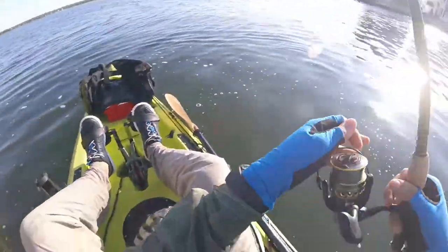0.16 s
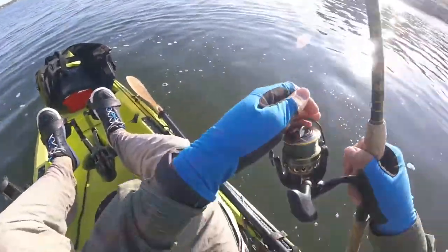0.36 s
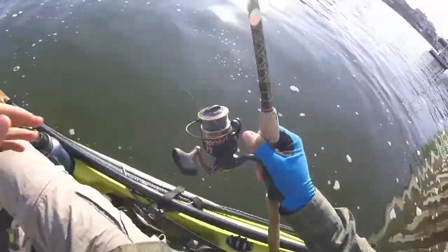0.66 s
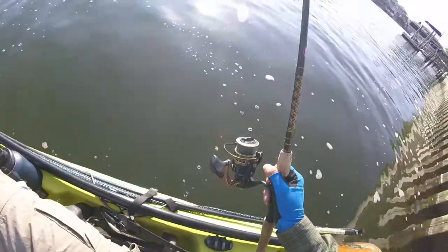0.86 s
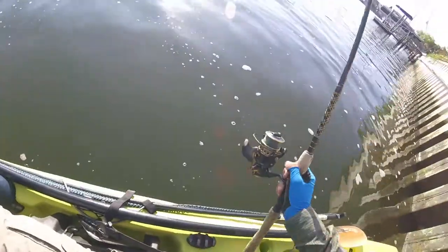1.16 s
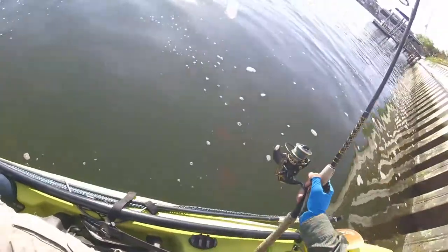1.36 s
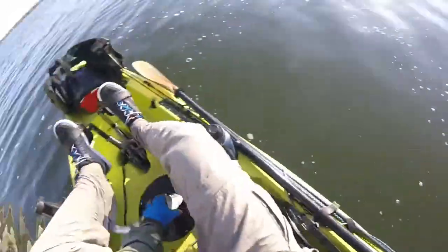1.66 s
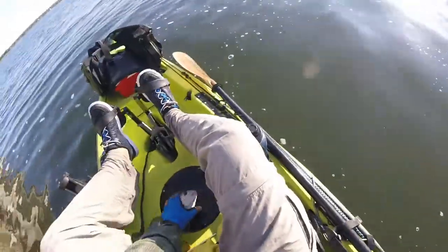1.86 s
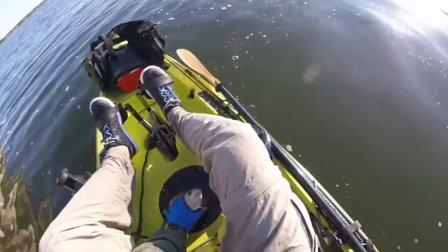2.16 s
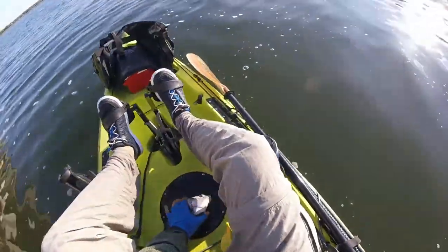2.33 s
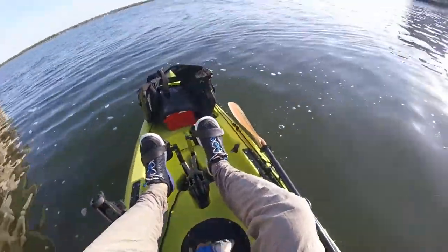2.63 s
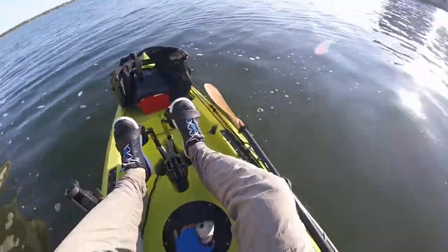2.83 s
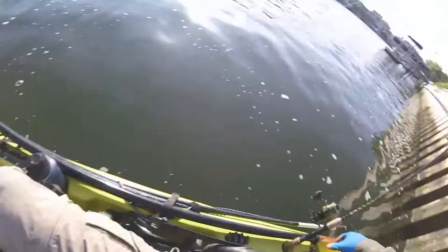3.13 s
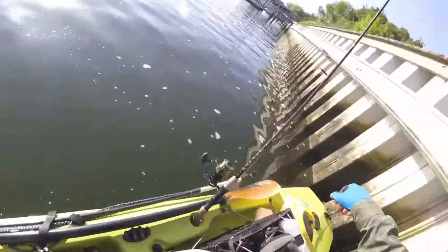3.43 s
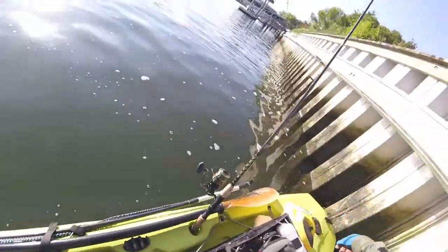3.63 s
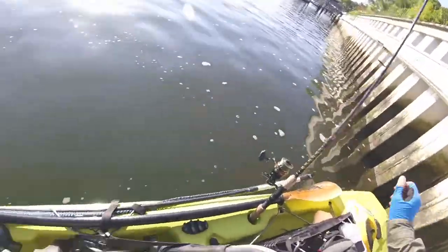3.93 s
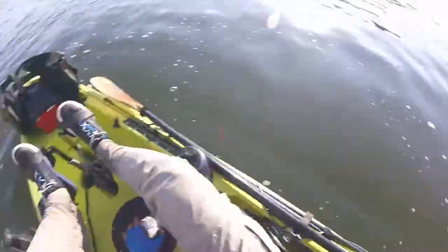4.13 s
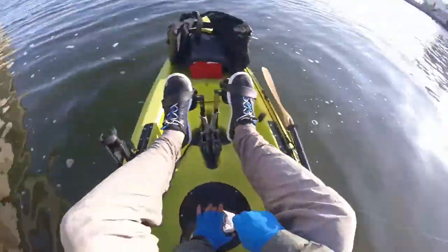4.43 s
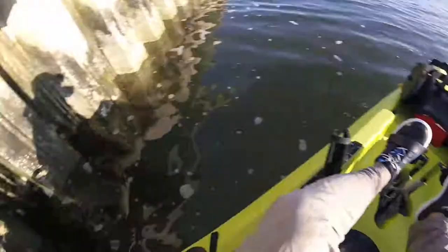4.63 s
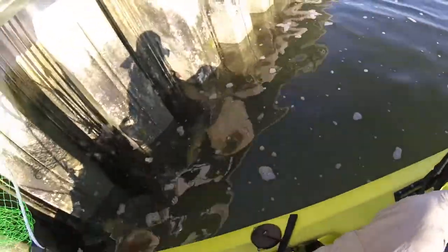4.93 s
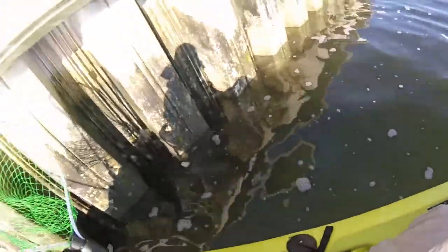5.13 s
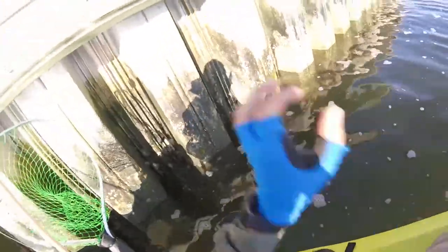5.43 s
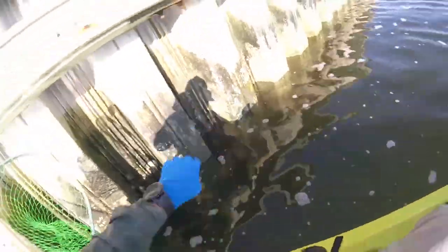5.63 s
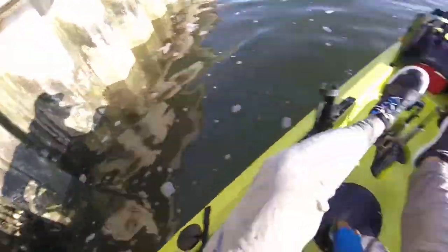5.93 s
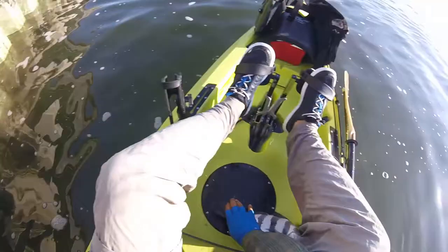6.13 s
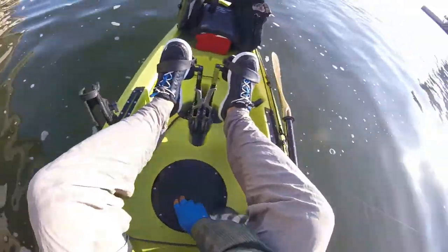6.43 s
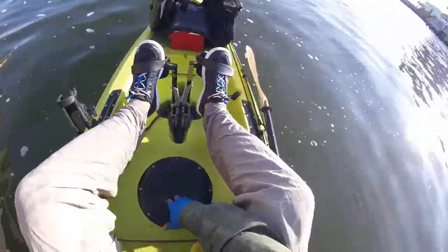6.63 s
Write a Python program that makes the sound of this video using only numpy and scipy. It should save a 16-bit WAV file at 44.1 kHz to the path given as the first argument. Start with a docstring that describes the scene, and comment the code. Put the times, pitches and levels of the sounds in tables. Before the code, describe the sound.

A body-worn microphone catches a fish flopping against a hollow plastic hull. Two crisp reel or rod clicks come first in near quiet. Dense irregular drumming with wet smacks runs for about two seconds, then a lull with dull grunts, tiny bird whistles and cloth rubbing. Harder, more spaced thumps return with faint metal rattle, fading to separate taps.

```python
"""Thuds and wet slaps of a hooked fish flopping in the open hatch of a hollow plastic kayak on calm water.
Each landing rings hull air, deck panel and hull modes; slaps and gear clicks are shaped noise bursts.
Loose metal tackle and swim-bladder grunts are decaying modes; far-off birds are gliding sines.
Rubbing, a low rumble of wind and rocking hull, and steady hiss are coloured noise under level curves."""
import sys
import numpy as np
from scipy import signal
from scipy.fft import rfft, irfft
from scipy.io import wavfile
from scipy.ndimage import uniform_filter1d

SR = 44100
rng = np.random.default_rng(int(sys.argv[2]) if len(sys.argv) > 2 else 0)


def voltage_ratio(level):
    """Linear amplitude factor for a level in decibels (scalar or array-like)."""
    return 10 ** (np.asarray(level, float) / 20)


def log_audio(samples):
    """Write samples as a 16-bit WAV file to the path given in sys.argv[1]."""
    # one column per channel
    frames = np.atleast_2d(samples).T
    # limit to full scale, then quantise
    limited = np.clip(frames, -1, 1)
    pcm = np.round(limited * 32767).astype(np.int16)
    wavfile.write(sys.argv[1], SR, pcm)


N = 298998  # samples

# Fish landings; its weight loads the deck panel and shifts the thump.
# Each row: start in seconds, hull boom drive in dB, deck thump drive in dB, thump in Hz, knock drive in dB.
LANDINGS = [(1.5533, -30, -13, 127, -8.5), (1.5709, -15, -54, 149, -9.5), (1.6109, -44, -47, 121, -28),
            (1.7204, -36, -16, 132, -17), (1.7732, -14.5, -20, 134, -2.5), (1.806, -41, -31, 147, -21),
            (1.8706, -20, -20, 128, -42), (1.905, -36, -17.5, 150, -12.5), (1.9401, -26, -33, 117, -23),
            (1.9725, -24, -17.5, 142, -20), (1.9955, -23, -18.5, 130, -16),
            (2.0748, -38, -12.5, 135, -17.5), (2.101, -19, -17, 158, -10), (2.1396, -34, -35, 175, -21),
            (2.1787, -31, -14, 130, -17.5), (2.2032, -16.5, -36, 185, -8), (2.2736, -32, -13, 135, -43),
            (2.2937, -13.5, -16.5, 151, -9), (2.3761, -36, -14.5, 141, -29), (2.3905, -13, -26, 148, -9),
            (2.4182, -20, -28, 172, -35), (2.4911, -19, -12.5, 129, -21), (2.5108, -13, -18.5, 144, -13.5),
            (2.5833, -25, -25, 129, -19.5), (2.5977, -28, -10.5, 139.6, -9), (2.6311, -32, -28, 140, -17),
            (2.6966, -19, -12.5, 143, -39), (2.7055, -38, -17, 150, -10), (2.7554, -45, -28, 133, -24),
            (2.7995, -16, -9, 134, -44), (2.8205, -43, -13.5, 151, -13), (2.9512, -18, -11.5, 128, -48),
            (2.963, -29, -12.5, 155.6, -7.5), (2.9743, -34, -15, 156, -35), (3.0583, -41, -21, 122, -43),
            (3.07, -41, -29, 171, -37), (3.0842, -10, -9.5, 163, -10.5), (3.2409, -16.5, -15, 168, -14),
            (3.4215, -35, -14, 152, -12), (3.4357, -16.5, -31, 162, -12.5), (3.4595, -32, -29.5, 147, -37),
            (3.6227, -44, -24.5, 171, -19), (4.1, -25.5, -41, 111, -37), (4.175, -35, -33, 110, -51),
            (5.0861, -33, -31, 150, -22), (5.137, -11, -8, 139, -10.5), (5.1625, -13, -15.5, 155, -15),
            (5.2611, -43, -50, 156, -36), (5.3227, -13, -9, 138, -12.5), (5.3401, -23, -21, 133, -12.5),
            (5.3529, -14, -20.5, 182, -13.5), (5.396, -32, -30, 136, -19.5), (5.467, -14, -15, 131, -18),
            (5.496, -26, -18, 179, -13), (5.5069, -6.5, -16.5, 168, -14), (5.6579, -11.5, -12, 132, -10.5),
            (5.7988, -34, -15, 142, -21.5), (5.8125, -14.5, -38, 139, -21.5),
            (5.9396, -21, -26.5, 137, -28.5), (6.0401, -58, -36, 123, -27), (6.065, -36, -28, 139, -23.5),
            (6.1157, -33, -27.5, 176, -17), (6.1381, -30, -22, 130, -13), (6.1567, -41, -33, 137, -16),
            (6.172, -45, -43, 177, -52), (6.3507, -41, -20, 162, -14), (6.4462, -29, -20.5, 143, -14.5),
            (6.4754, -30, -27, 157, -29), (6.6392, -22, -19, 151, -11.5), (6.6669, -20, -27.5, 164, -24)]
# Rod, reel and hands bump the hull. Each row: start in seconds, hull boom drive in dB,
# deck thump drive in dB, knock drive in dB, knock centre in Hz.
BUMPS = [(0.0794, -54, -36, -23.5, 303), (0.452, -65, -60, -29, 330), (0.4842, -63, -40.5, -35, 1090),
         (0.8024, -42, -41.5, -53, 200), (0.8553, -35, -40, -58, 300), (0.8642, -33, -38, -19, 650),
         (1.286, -59, -36.5, -45, 210), (1.335, -57, -44, -52, 200), (1.443, -34, -26.5, -8, 1000),
         (3.929, -59, -52, -36.5, 410), (4.8051, -50, -43, -30.5, 330), (4.9618, -52, -54, -35, 605)]
# Air modes in the hull. Each row: nominal frequency in Hz, relative level in dB, t60 in seconds.
BOOM_MODES = [(53, -4, .13), (60, 0, .12), (82, -8, .08)]
# Knock modes of the hull. Each row: nominal frequency in Hz, relative level in dB, t60 in seconds.
HULL_MODES = [(237.7, 2.5, 0.082), (283, 2, 0.089), (352.2, -2, 0.1), (453.3, -2, 0.077),
              (509.4, -13, 0.16), (650, -9.5, 0.069), (820, -13.5, 0.2), (924, -6, 0.11), (1182, -6, 0.089),
              (1500, -23.5, 0.013), (1990, -18, 0.028)]
THUMP_T60_S, BARE_THUMP_HZ = .095, 172  # deck panel; bare = without the fish's weight
KNOCK_HZ, HARD_OCTAVES, HARD_DB = 330, 0.13, 12  # knock well above thump: a hard, brighter landing
HELD_S = .025  # the hand on the gear damps its knock

# Wet skin, fins and tail smack the plastic; loose tackle knocks too.
# Each row: start in seconds, drive in dB, brightness centre in Hz, decay in ms.
SLAPS = [(.995, -41, 1500, 8.9), (1.287, -52, 2680, 7.6), (1.553, -17, 1540, 15), (1.567, -14, 2800, 3.5),
         (1.601, -30.5, 2380, 6), (1.6614, -34, 3070, 9.8), (1.6858, -21, 3560, 1.1),
         (1.7145, -29, 4000, 8.5), (1.7721, -11.5, 2300, 14), (1.8318, -20, 2630, 19.4),
         (1.8913, -20, 2930, 15), (1.9046, -2, 2070, 3), (1.9392, -27.5, 3570, 14), (1.9723, -26, 2090, 19),
         (1.991, -24, 2340, 33), (2.001, -20, 3200, 6.2), (2.0725, -20.5, 2400, 10),
         (2.0987, -9.5, 2250, 12.6), (2.117, -30, 5000, 2.7), (2.1781, -19.5, 1760, 2.9),
         (2.198, -12, 2630, 6.6), (2.2045, -8.5, 2700, 4), (2.2737, -21, 2160, 2.1),
         (2.294, -11, 2640, 4.3), (2.374, -25, 3710, 17), (2.3893, -8, 2150, 4), (2.4909, -24.5, 2370, 2.7),
         (2.5083, -19, 2300, 16), (2.5427, -16, 2400, 8.5), (2.5839, -17, 1650, 5.9),
         (2.5943, -19, 1830, 4.7), (2.6038, -13, 1410, 15), (2.6297, -16, 1140, 5.8),
         (2.694, -26, 1730, 7.3), (2.7028, -5, 1710, 5.8), (2.75, -27.5, 5100, 13), (2.774, -16, 2730, 5.7),
         (2.7976, -19, 2040, 7.1), (2.809, -7, 1490, 5), (2.8706, -35, 1290, 5.5), (2.8992, -28, 2380, 8.3),
         (2.9495, -15.5, 2130, 7), (2.962, -7.5, 1550, 5.1), (3.063, -32.5, 3820, 2),
         (3.0845, -9, 2260, 5.5), (3.113, -31.5, 4950, 14), (3.21, -25, 1300, 13.5),
         (3.2402, -11.5, 1500, 7.8), (3.3147, -31, 1290, 14), (3.3527, -23, 1920, 4.8),
         (3.4204, -21, 1450, 5.3), (3.4347, -7.5, 2100, 6), (3.4569, -13.5, 925, 10.5),
         (3.5293, -33, 1880, 19), (3.622, -26, 1150, 9.2), (3.648, -24.5, 1070, 7.3),
         (3.6726, -26, 1140, 3.7), (3.695, -44.5, 3820, 9.6), (3.927, -36, 1930, 4.5),
         (3.936, -45.5, 5130, 11), (4.596, -38, 2800, 4.5), (4.619, -42, 2420, 4.2), (4.823, -35, 1430, 12),
         (4.9592, -35, 1500, 15), (5.0595, -29, 2300, 14), (5.0883, -21, 950, 3.6), (5.136, -17, 1050, 42),
         (5.1632, -18, 1700, 17), (5.2576, -26.5, 1950, 18), (5.282, -20, 2140, 16),
         (5.3209, -14, 1110, 2.9), (5.3413, -18, 1850, 6.5), (5.3524, -7, 1670, 7.9),
         (5.392, -23, 2800, 7.2), (5.4685, -21, 2400, 3.2), (5.497, -16, 2150, 13), (5.5063, -5, 2260, 4.5),
         (5.5505, -19, 1140, 4.5), (5.5653, -22.5, 1900, 14), (5.608, -37, 2740, 5.5),
         (5.6576, -8, 1300, 10.7), (5.798, -28, 2220, 11), (5.8127, -13, 1100, 18),
         (5.9362, -30.5, 3400, 4.1), (5.945, -30, 3600, 4.5), (6.0406, -24, 4500, 3.5),
         (6.0626, -30, 2380, 7.4), (6.1149, -27.5, 3640, 4.9), (6.1556, -11.5, 654, 12),
         (6.3509, -22, 1040, 4), (6.4457, -16.5, 1670, 6.1), (6.4611, -25.5, 2920, 13),
         (6.5113, -19, 1820, 2.3), (6.5293, -33.5, 5340, 3.7), (6.6094, -22.5, 3470, 3),
         (6.6388, -28, 2520, 4.1), (6.6518, -21.5, 1180, 3.5), (6.6657, -22.5, 830, 5.1)]
# Slap colour. Each row: frequency in Hz, level in dB.
SLAP_COLOUR = [(500, 20), (1200, 1), (2500, -5), (5000, -8.5), (9000, -16), (13000, -19), (15000, -45)]
SLAP_RISE_MS = 1.54

# Small rebounds of fins and gear at random moments, as strong as the fish is busy.
REBOUNDS, REBOUND_SPREAD_DB = 70, 7.5
REBOUND_KNOCK_DB, REBOUND_SLAP_DB = -16, -23
REBOUND_HZ, REBOUND_MS = 2300, 2.5  # slap centre before the random brightness factor; slap decay

# Rubbing of cloth and hands on wet plastic.
# Each row: time in seconds, low rub level in dB, bright rub level in dB.
RUB = [(0, -61, -83), (.36, -57, -69), (.53, -65, -99), (.83, -66, -59.5), (.98, -55.5, -66),
       (1.3, -73, -60.5), (3.5, -55, -89), (3.87, -59, -67), (4.19, -71, -67.5), (4.38, -61, -64),
       (4.44, -50, -54), (4.57, -56, -49), (4.87, -50.5, -67), (5.04, -50.5, -53.5), (5.25, -43.5, -45.5),
       (6.0, -45.5, -55.5), (6.3, -59, -66.5), (6.78, -89, -51.5)]
# Low rub colour. Each row: frequency in Hz, level in dB.
RUB_LOW = [(120, 11), (300, 9.5), (520, 2), (900, -4.5), (1500, -15), (2500, -33), (4000, -58)]
# Bright rub colour. Each row: frequency in Hz, level in dB.
RUB_BRIGHT = [(800, 14), (2000, 8.5), (3800, 6.5), (5500, -2.5), (9000, -16), (12500, -54), (15000, -52)]
SETTLE_S = 0.053  # slide after a landing dies by 1/e
SLIDE_LOW_DB, SLIDE_BRIGHT_DB = -24, -41  # rub under the slide, relative to the landing

# Reel bail and rod butt click.
# Each row: start in seconds, drive in dB, brightness centre in Hz, rise in ms, decay in ms.
CLICKS = [(.4665, -36, 5030, .6, 3.0), (.4705, -29, 4900, .8, 2.4), (0.4828, -10.5, 4480, 0.46, 3.2),
          (.4843, -5, 2380, 0.28, 2.3), (.4846, -8.5, 5640, 0.48, 1.3), (.486, -20, 3500, 0.23, 2),
          (.5, -35.5, 5030, 7.5, 6), (.8628, -22, 1670, 0.22, 5.4), (1.421, -49, 3300, .8, 3.9),
          (1.4408, -7.5, 6070, 0.5, 3.5), (1.4432, -2, 1730, 0.66, 1.4), (1.448, -21, 6500, .6, 1.5),
          (1.45, -17.5, 1070, 1.2, 8.2)]
# Click colour. Each row: frequency in Hz, level in dB.
CLICK_COLOUR = [(600, -8), (1200, -3), (2200, -3), (3000, -6), (4000, 2), (6500, -9.5), (10000, -10),
                (13000, -14), (15000, -39)]

# Loose metal tackle is jolted. Each row: start in seconds, drive in dB, centre of favoured modes in Hz,
# fall in dB per octave squared, seconds until it is damped.
JOLTS = [(1.47, -54, 2358, 30, 0.1), (2.389, -42, 2358, 1, .1), (2.751, -37.5, 2340, 39, 0.1),
         (3.114, -39.5, 3500, 1, 0.073), (4.799, -48.5, 1340, 30, 0.12), (5.39, -34, 2200, 1, 0.105),
         (5.608, -54, 1740, 27, 0.063), (6.061, -47, 2000, -2, 0.083)]
# Metal modes. Each row: frequency in Hz, relative level in dB, t60 in seconds.
TACKLE_MODES = [(1220, -1, .3), (1318, -7, .3), (1578, -5, .2), (2094, -11, .3), (2358, 0, .45),
                (2880, -10, .2), (3110, -6, .3), (3600, -9, .1), (3890, -10, .2), (4060, -12, .2),
                (4740, 0, .07), (5712, -14, .15), (6218, -24, .25), (6751, -20, .2), (7540, -18, .08),
                (8010, -18, .1), (9580, -22, .08)]

# Swim-bladder twitches. Each row: start in seconds, drive in dB.
GRUNTS = [(3.777, -34), (3.805, -33.5), (3.84, -32.5), (3.88, -32), (4.078, -30.5), (4.111, -34.5),
          (4.146, -30.5)]
# Bladder modes. Each row: nominal frequency in Hz, relative level in dB, t60 in seconds.
BLADDER_MODES = [(170.8, -6, 0.19), (282, 15, 0.02), (450, -1, 0.041), (584, -2.5, 0.032)]

# Bird notes. Each row: start in seconds, length in seconds, start in Hz, end in Hz, level in dB.
BIRDS = [(.26, 0.036, 2384, 2080, -65), (0.362, 0.041, 3430, 3950, -63), (.396, .022, 3880, 3370, -65),
         (0.414, .022, 3430, 4170, -67), (1.062, .126, 3560, 2350, -67), (1.32, 0.032, 2970, 2760, -72),
         (1.38, .028, 4150, 3400, -72), (3.837, 0.028, 3830, 3600, -70), (4.075, 0.023, 2900, 2930, -70),
         (4.103, .025, 3320, 3350, -64), (4.195, 0.092, 2740, 2340, -66), (6.387, 0.031, 4100, 2980, -61)]
GLIDE = .17  # share of a note in which it slides most of the way to its end pitch

# Low rumble level. Each row: time in seconds, level in dB.
RUMBLE_LEVEL = [(0, -48.5), (.66, -53), (.85, -46), (1.26, -51.5), (1.66, -32.5), (2.4, -48), (2.93, -48),
                (3.27, -40), (3.51, -38), (3.87, -50), (4.85, -50), (5.55, -32), (6.16, -36.5), (6.34, -39),
                (6.78, -37)]
# Low rumble colour. Each row: frequency in Hz, level in dB.
RUMBLE_COLOUR = [(15, 20.5), (30, 23.5), (60, 19.5), (130, 13), (250, 1), (500, -33)]
# Background hiss level. Each row: time in seconds, level in dB.
HISS_LEVEL = [(0, -56), (.43, -57.5), (.55, -63.5), (4.3, -61.5), (4.45, -57.5), (6.78, -60)]
# Hiss colour. Each row: frequency in Hz, level in dB.
HISS_COLOUR = [(300, 3.5), (1000, -6), (3000, -8.5), (5000, -21), (8000, -12.5), (12500, -24.5),
               (14800, -30)]

PORT_HZ, PORT_WIDTH_HZ, PORT_DB = 6423, 268, 14.5  # the microphone port resonates
CEILING = .95  # soft saturation of the input, full scale = 1
LOW_HZ, TOP_HZ = 30, 13300  # input band edges


def evened(x):
    """Scales to unit rms."""
    return x / np.sqrt(np.mean(x ** 2) + 1e-20)


def drift(x, size):
    """Slow random curve of unit rms: white noise x under a moving average of size samples."""
    return evened(uniform_filter1d(x, size=size))


def read(points, hz):
    """Reads a spectrum in dB on a log-frequency axis."""
    f, db = np.transpose(points)
    return np.interp(np.log(hz + 1), np.log(f + 1), db)


def level(rows, column):
    """Gain along a curve in dB."""
    rows = np.array(rows)
    return voltage_ratio(np.interp(np.arange(N) / SR, rows[:, 0], rows[:, column]))


def add(mix, start_s, sound):
    """Mixes a sound in at start_s, cut at the end of the mix."""
    part = mix[round(start_s * SR):][:len(sound)]
    part += sound[:len(part)]


def bell_db(hz, centre_hz, fall_db):
    """Level falls by fall_db for each octave squared away from the centre."""
    return -fall_db * np.log2(hz / centre_hz) ** 2


def ring(modes, shift_db, contact_s, spread_db=0., detune=0., size=9000):
    """A blow of finite contact time rings the modes; where it lands changes their share and tuning a little."""
    hz, db, t60_s = np.transpose(modes)[:, :, None]
    share_chance, tuning_chance = rng.standard_normal((2, len(modes), 1))
    t = np.arange(size) / SR
    usual = voltage_ratio(db + np.reshape(shift_db, (-1, 1)))
    share = usual * voltage_ratio(spread_db * share_chance)
    share = share * np.linalg.norm(usual) / np.linalg.norm(share)  # the blow's energy stays the same
    tuned_hz = hz * (1 + detune * tuning_chance)
    waves = share * voltage_ratio(-60 * t / t60_s) * -np.sin(2 * np.pi * tuned_hz * t)
    return waves.sum(0) * (1 - np.exp(-t / contact_s))


def bursts(events, colour, fall_db, pop, grit_db, tail_db, tail_s):
    """Contact noise swells, pops with a brief tone, and dies treble first into a dull tail."""
    out, t = np.zeros(N), np.arange(4096) / SR
    hz = np.fft.rfftfreq(4096, 1 / SR) + 1
    dull = 1 / (1 + (hz / 3000) ** 4)
    for start_s, db, centre_hz, rise_ms, decay_ms in events:
        white, lumps, spots = rng.standard_normal((3, 4096))
        spot_db = 3 * drift(spots[:len(hz)], 30)  # each struck spot has its own resonances
        grit = voltage_ratio(grit_db * abs(drift(lumps, 50)))  # contact breaks into small clicks
        shape_db = read(colour, hz) + bell_db(hz, centre_hz, fall_db) + spot_db
        spray = rfft(white * grit) * voltage_ratio(shape_db)
        spray = spray / np.std(irfft(spray))
        low, high = irfft(spray * dull), irfft(spray * (1 - dull))
        rise_s, decay_s = rise_ms / 1000, decay_ms / 1000
        after = np.maximum(t - rise_s, 0)
        burst = low * np.exp(-after / decay_s) + high * np.exp(-after / (.95 * decay_s))
        tail = low * np.exp(-after / tail_s) + high * np.exp(-after / (0.41 * tail_s))
        swell = np.minimum(t / rise_s, 1) ** 0.5
        tone = pop * np.sin(2 * np.pi * centre_hz * after) * np.exp(-after * centre_hz / 0.88)
        add(out, start_s, voltage_ratio(db) * (0.36 * (burst + voltage_ratio(tail_db) * tail) * swell + tone))
    return out


def noise(colour, patchy_db, size):
    """Coloured noise of unit rms whose level drifts in random patches of time and pitch."""
    frames, hz = 4 * N // size + 5, np.fft.rfftfreq(size, 1 / SR)
    real, imag, patches = rng.standard_normal((frames, len(hz), 3)).T
    patches = uniform_filter1d(patches, size=8, axis=0)
    patches = evened(uniform_filter1d(patches, size=6, axis=1))
    z = (real + 1j * imag) * voltage_ratio(read(colour, hz)[:, None] + patchy_db * patches)
    return evened(signal.istft(z, nperseg=size, noverlap=size * 3 // 4)[1][:N])


def busy():
    """How hard the fish still slides: each landing's strength, dying away."""
    kicks = np.zeros(N)
    start_s, _, thump_db, _, knock_db = np.transpose(LANDINGS)
    kicks[(start_s * SR).astype(int)] = voltage_ratio(thump_db) + voltage_ratio(knock_db)
    return signal.lfilter([1], [1, -np.exp(-1 / (SETTLE_S * SR))], kicks)


def rebounds():
    """Random moments in seconds, each with a strength in dB and a brightness factor."""
    when, size, tone = rng.random((REBOUNDS, 3)).T
    busy_db = 20 * np.log10(busy()[(when * N).astype(int)] + 1e-6)
    db = busy_db + REBOUND_SPREAD_DB * np.log(size + 1e-3)
    return np.transpose([when * N / SR, db, 2 ** (tone - .5)])


def hull_blow(start_s, boom_db, thump_db, thump_hz, knock_db, centre_hz, held, out):
    """A weight pushes the hull: slow for the boom, faster for thump and knock."""
    hz = np.array(HULL_MODES)[:, 0]
    knock_shift_db = knock_db - 5.5 + bell_db(hz, centre_hz, 4.5)
    add(out, start_s, ring(BOOM_MODES, boom_db, .0045, 2, .03))
    add(out, start_s, ring([(thump_hz, thump_db + 6.5, THUMP_T60_S)], 0, 0.0036))
    add(out, start_s, ring(HULL_MODES, knock_shift_db, 0.0014, 4.1, 0.058) * held)


def thuds(small):
    """Fish, gear and small rebounds strike the hull; hard landings knock brighter, held gear is damped."""
    out, hz = np.zeros(N), np.array(HULL_MODES)[:, 0]
    for start_s, boom_db, thump_db, thump_hz, knock_db in LANDINGS:
        hardness = np.tanh((knock_db - thump_db) / HARD_DB)
        centre_hz = KNOCK_HZ * 2 ** (HARD_OCTAVES * hardness)
        hull_blow(start_s, boom_db, thump_db, thump_hz, knock_db, centre_hz, 1, out)
    held = np.exp(-np.arange(9000) / (HELD_S * SR))
    for start_s, boom_db, thump_db, knock_db, centre_hz in BUMPS:
        hull_blow(start_s, boom_db, thump_db, BARE_THUMP_HZ, knock_db, centre_hz, held, out)
    for start_s, db, tone in small:
        shift_db = db + REBOUND_KNOCK_DB + bell_db(hz, 430 * tone, 6.7)
        add(out, start_s, ring(HULL_MODES, shift_db, 0.00043, 6.9, 0.043, size=4500))
    return out


def slaps(small):
    """Wet smacks pop as trapped air escapes, with a patter of spray and hull rattle; tackle knocks too."""
    rows = [(s, db, hz, SLAP_RISE_MS, decay_ms) for s, db, hz, decay_ms in SLAPS]
    rows += [(s, db + REBOUND_SLAP_DB, REBOUND_HZ * tone, SLAP_RISE_MS, REBOUND_MS) for s, db, tone in small]
    return bursts(rows, SLAP_COLOUR, 2.97, pop=0.62, grit_db=5.5, tail_db=-12.5, tail_s=0.017)


def rubbing():
    """Scales and cloth slide in small catches: both bands flicker with the same uneven grip."""
    grip = voltage_ratio(3 * drift(rng.standard_normal(N), 300))
    low = evened(noise(RUB_LOW, 1.78, size=512) * grip)
    bright = evened(noise(RUB_BRIGHT, 4.9, size=256) * grip)
    slide = uniform_filter1d(busy(), size=400)
    low_gain = level(RUB, 1) + voltage_ratio(SLIDE_LOW_DB) * slide
    bright_gain = level(RUB, 2) + voltage_ratio(SLIDE_BRIGHT_DB) * slide
    return low * low_gain + bright * bright_gain


def clicks():
    """Hard plastic and wire snap together, dry and broad."""
    return bursts(CLICKS, CLICK_COLOUR, 11.0, pop=0.23, grit_db=2.0, tail_db=-27.5, tail_s=0.024)


def tackle():
    """Long metal modes that waver as the piece swings and stop when it lands again."""
    out, hz, t = np.zeros(N), np.array(TACKLE_MODES)[:, 0], np.arange(9000) / SR
    for start_s, db, centre_hz, fall_db, lasts_s in JOLTS:
        swing = voltage_ratio(3 * drift(rng.standard_normal(9000), 500))
        damped = np.exp(-np.maximum(t - lasts_s, 0) / .012)
        rung = ring(TACKLE_MODES, db + bell_db(hz, centre_hz, fall_db), 0.0042, 0.97)
        add(out, start_s, rung * swing * damped)
    return out


def grunts():
    """Each muscle twitch drums the swim bladder once."""
    out = np.zeros(N)
    for start_s, db in GRUNTS:
        add(out, start_s, ring(BLADDER_MODES, db, 0.0043, 2.1, 0.028, size=5000))
    return out


def birds():
    """Thin gliding whistles that flutter on their way over the water."""
    out = np.zeros(N)
    for start_s, length_s, start_hz, end_hz, db in BIRDS:
        t = np.arange(0, length_s, 1 / SR)
        waver, flutter = (drift(v[:len(t)], 200) for v in rng.standard_normal((2, 6000)))
        hz = end_hz + (start_hz - end_hz) * np.exp(-t / (GLIDE * length_s))
        tone = np.sin(2 * np.pi * np.cumsum(hz * (1 + .012 * waver)) / SR)
        fade = signal.windows.tukey(len(t), .3)
        add(out, start_s, np.sqrt(2) * voltage_ratio(db + 1.4 * flutter) * tone * fade)
    return out


def rumble():
    """Low rumble of wind and rocking hull: patchy low noise under a level curve."""
    return noise(RUMBLE_COLOUR, 2.4, size=2048) * level(RUMBLE_LEVEL, 1)


def hiss():
    """Steady background hiss: broad noise under a slow level curve."""
    return noise(HISS_COLOUR, 1.0, size=1024) * level(HISS_LEVEL, 1)


def scene():
    """Sums the fish and its gear over birds, rumble and hiss; one channel."""
    small = rebounds()
    fish = thuds(small) + slaps(small) + rubbing() + grunts()
    gear = clicks() + tackle()
    return (fish + gear + birds() + rumble() + hiss())[None]


def top_cut(x):
    """Nothing passes above the cut-off."""
    return signal.sosfilt(signal.butter(12, 15020, fs=SR, output="sos"), x)


def record(dry):
    """The microphone port lifts one treble band; the input rounds off the peaks and cuts both ends."""
    port = signal.lfilter(*signal.iirpeak(PORT_HZ, PORT_HZ / PORT_WIDTH_HZ, SR), dry)
    lifted = dry + (voltage_ratio(PORT_DB) - 1) * port
    rounded = lifted / (1 + (lifted / CEILING) ** 4) ** .25
    mix = signal.sosfilt(signal.butter(2, LOW_HZ, "high", fs=SR, output="sos"), rounded)
    mix = signal.sosfilt(signal.butter(8, TOP_HZ, fs=SR, output="sos"), mix)
    return top_cut(mix)


dry = scene()
out = record(dry)
log_audio(out)
```